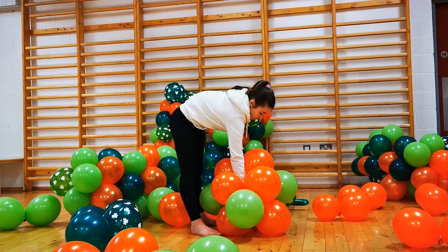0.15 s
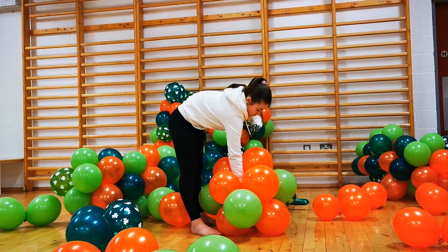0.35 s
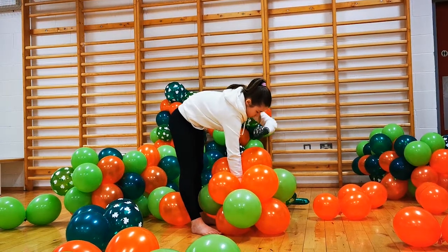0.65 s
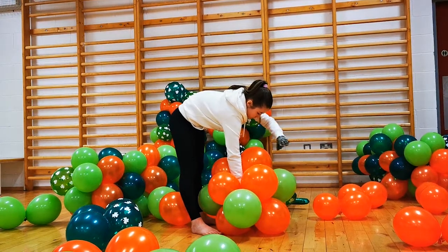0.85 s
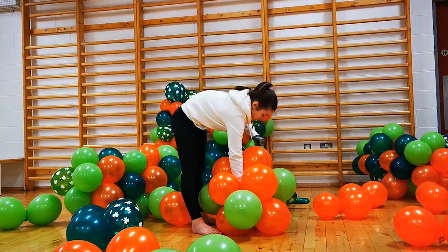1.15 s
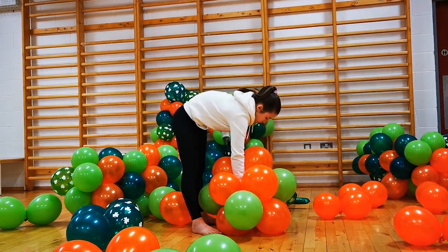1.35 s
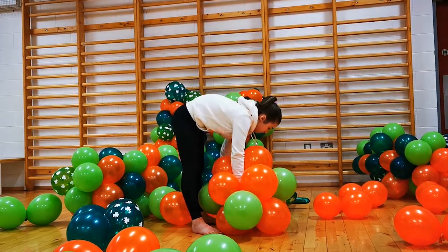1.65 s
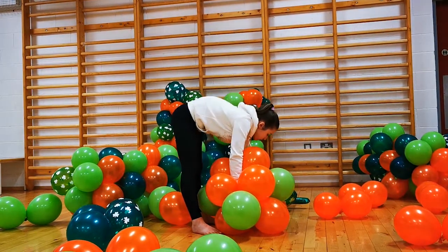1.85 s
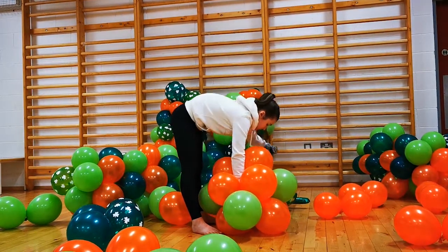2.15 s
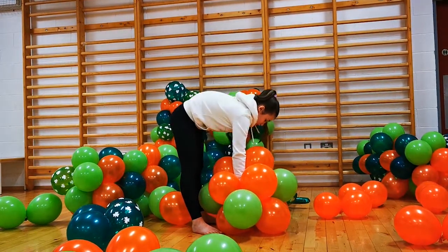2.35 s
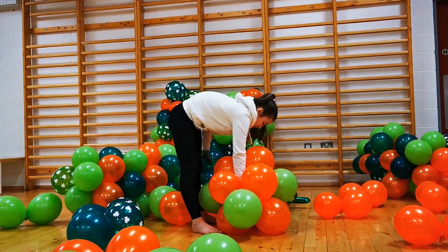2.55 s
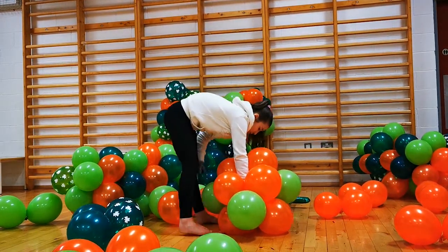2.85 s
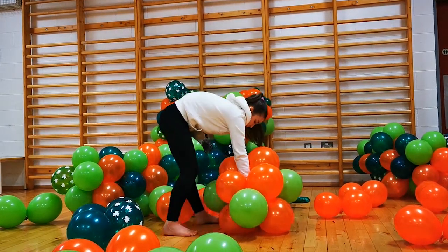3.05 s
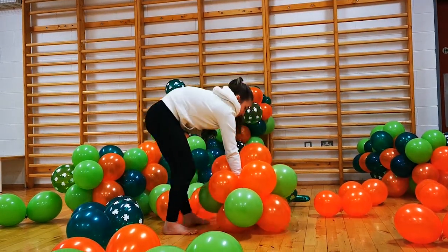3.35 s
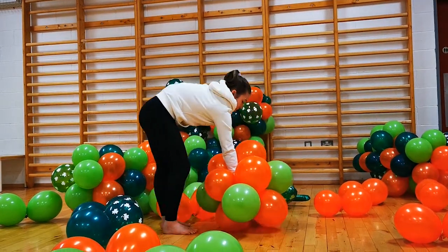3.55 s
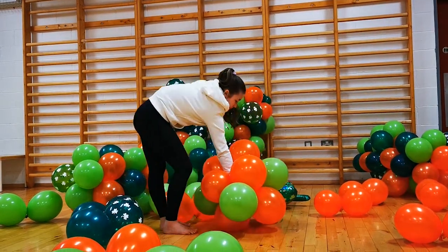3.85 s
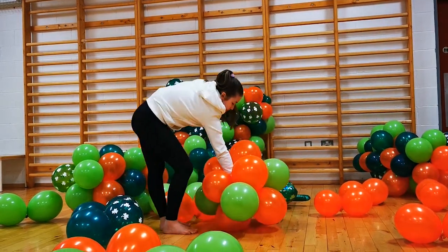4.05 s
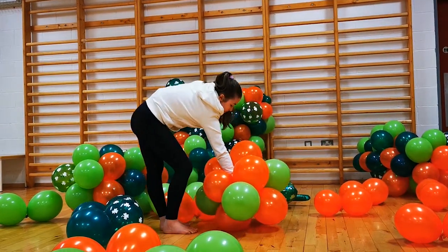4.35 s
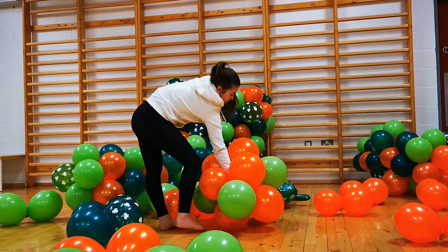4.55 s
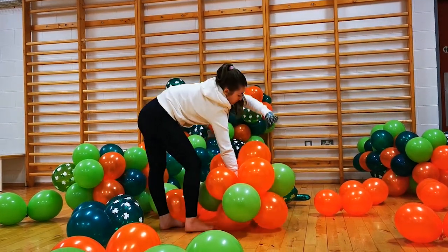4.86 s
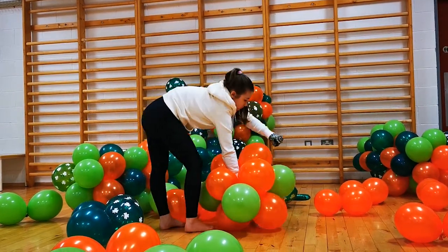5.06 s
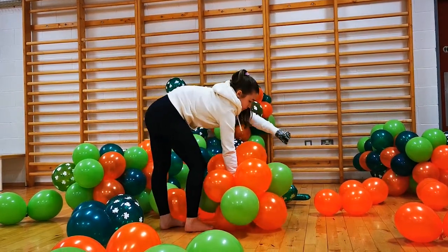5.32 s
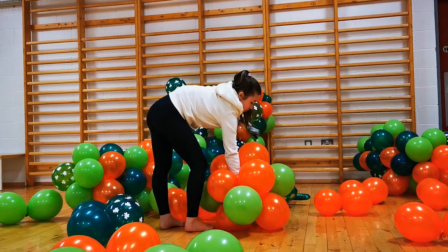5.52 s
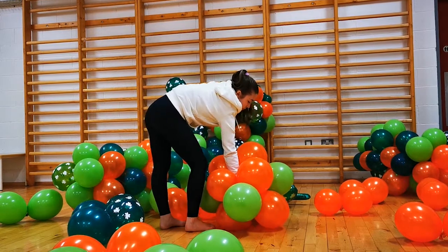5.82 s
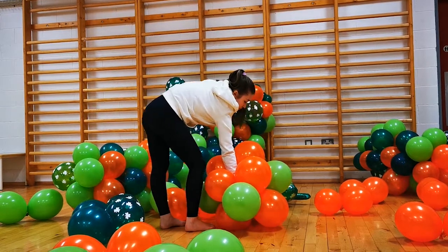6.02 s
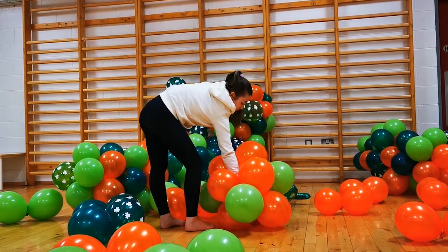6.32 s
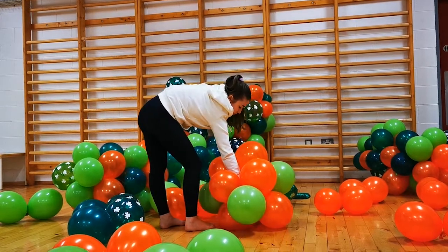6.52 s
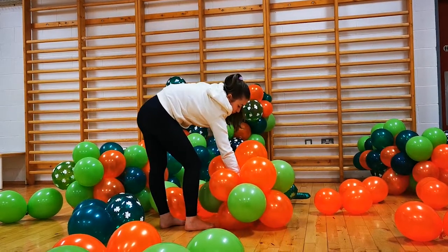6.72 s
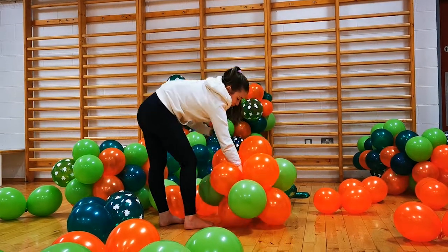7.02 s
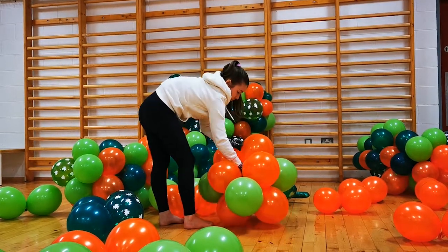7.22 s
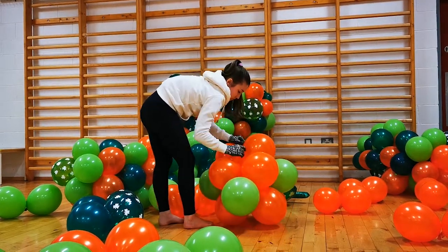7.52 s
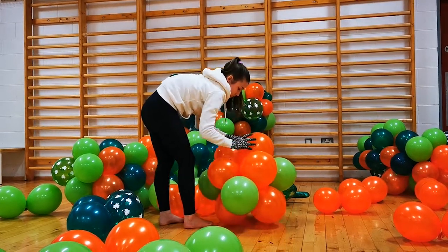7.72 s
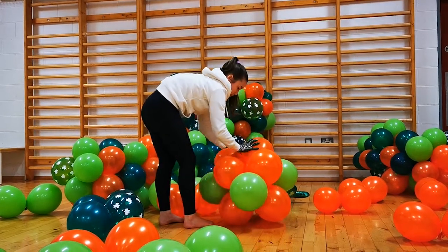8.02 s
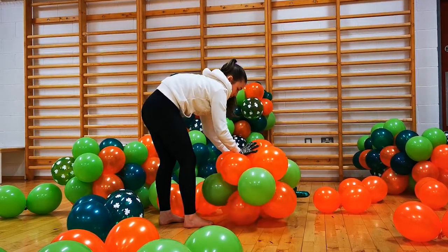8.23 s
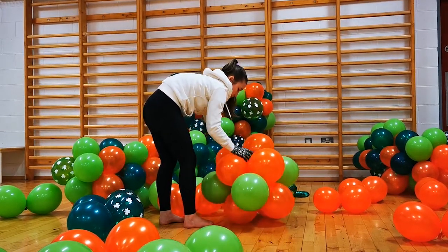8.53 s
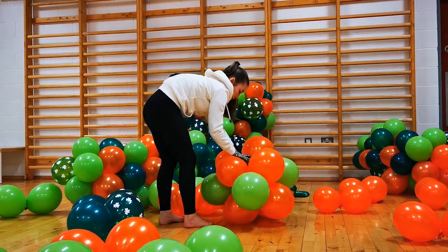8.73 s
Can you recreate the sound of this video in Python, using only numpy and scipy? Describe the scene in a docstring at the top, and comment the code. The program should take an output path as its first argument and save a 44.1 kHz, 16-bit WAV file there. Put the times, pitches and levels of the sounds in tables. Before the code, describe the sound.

A cluster of inflated latex balloons is handled in a reverberant wooden hall. Early on come separate hollow bumps with skin slaps and brief hissy skids, with faint creaks between. Midway, a flurry of snapping creaks, then more knocks. Later the rubbing grows stronger, with a sharp crack, short squeaks and rasping strokes. Stereo microphones at a modest distance catch a ringing tail, quiet air noise and a low wavering hum.

```python
"""Balloons rubbed in a sports hall

A cluster of latex balloons is pressed and turned by hand in a wooden sports hall.
The balloons bump with a hollow thump and a noisy slap, made from ringing tones and short noise bursts.
They skid with a hiss of noise, and creak, snap and squeak where their skins stick and slip.
The hall rings on for about a second, over steady air noise and a low hum that wavers."""
import sys
import numpy as np
from scipy import signal
from scipy.fft import rfft, irfft, next_fast_len
from scipy.io import wavfile
from scipy.ndimage import uniform_filter1d, map_coordinates

SR = 44100
rng = np.random.default_rng(int(sys.argv[2]) if len(sys.argv) > 2 else 0)


def pcm_store(signal):
    """Save signal as 16-bit PCM."""
    levels = np.round(np.clip(np.atleast_2d(signal), -1, 1) * 32767)
    wavfile.write(sys.argv[1], SR, levels.astype(np.int16).T)


N = 391608  # length of the scene [samples]

# low resonances of the air in a balloon: (frequency [Hz], width before damping [Hz], relative level [dB])
BOOM_MODES = [(191, 23, -5), (246.6, 37.4, -1.5), (303.5, 42.6, -0.5), (360, 48, -0.5), (444, 57, -9.5)]
# higher, hollow resonances: (frequency [Hz], width before damping [Hz], relative level [dB])
HOLLOW_MODES = [(487.3, 37, -1), (560, 63, -1), (625.5, 72, -4), (910, 243, -16)]
# tone colour of skin scraping: (frequency [Hz], relative level [dB])
RASP_SPECTRUM = [(300, -24.5), (700, -9), (1000, 6), (1500, -6), (2300, 2), (2900, -5), (4200, -1.5),
                 (5400, -10), (7000, -9), (12000, -35.5)]
# tone colour of the fine hiss of skin on skin: (frequency [Hz], relative level [dB])
HISS_SPECTRUM = [(500, -35), (1500, -7), (3000, -2.5), (4500, 1), (5700, -1.5), (7200, 1), (8600, -0.5),
                 (9700, -1), (10600, 1.5), (12000, -5.5), (14000, -10), (16000, -13.5)]
# tone colour of a whole balloon being pushed: (frequency [Hz], relative level [dB])
THUMP_SPECTRUM = [(15, -27), (35, -9.5), (60, -4), (78, -6), (98, 4), (128, -7.5), (165, -0.5),
                  (260, -22.5), (600, -57), (2000, -71)]


def bumps():
    """Skins brush just before they meet; the bump pushes the whole balloon, rings its air and slaps its skin."""
    # (time [s], thump [dB], boom [dB], hollow ring [dB], ring pitch [ratio], slap [dB],
    # slap treble [dB], left over right [dB]); sound levels are before the trims below
    bump_table = [(.165, -65, -51, -67, 0.83, -60, -66, -3), (.237, -69, -54.5, -71, 1.1, -65, -74, 3),
                  (.69, -44, -39, -42.5, 0.99, -50.5, -43.5, 0), (.912, -33.5, -35, -37, 0.94, -39, -35, 2),
                  (1.327, -55, -45, -47, 1.07, -52.5, -69, 2.5),
                  (2.407, -54, -44.5, -48.5, 0.778, -60, -63, 3), (2.465, -61, -60, -67, 0.8, -70, -66, 3),
                  (3.163, -33, -30, -33, 1.06, -44, -46.5, 1),
                  (3.539, -46, -46.5, -35.5, 1.002, -43, -36.5, -2.5),
                  (5.228, -36.5, -41, -42, 1, -38, -35.5, -1.5),
                  (5.418, -40, -35.5, -35, 0.93, -39, -33, -2),
                  (5.718, -45.5, -43.5, -45, 1.03, -45.5, -53, -1),
                  (8.234, -46, -57, -56, 0.76, -64, -70, -1)]
    # tone colour of slapped skin: (frequency [Hz], relative level [dB])
    slap_spectrum = [(200, 1), (700, -5), (1200, 1.5), (2300, 5), (3000, 0.5), (4200, -3), (6000, -6.5),
                     (14000, -48)]
    out = np.zeros((2, N))
    t = np.arange(SR // 6) / SR
    lead = np.arange(SR // 80) / SR  # the brush comes before the blow
    for s, thump_db, boom_db, ring_db, pitch, slap_db, treble_db, pan_db in bump_table:
        brush_noise = unit(colour(rng.standard_normal(len(lead)), slap_spectrum))
        brush = amp(slap_db - 10.0) * brush_noise * lead / lead[-1]
        thump = amp(thump_db) * burst(colour(np.exp(-t / 0.00061), THUMP_SPECTRUM))
        boom = amp(boom_db + 0.2) * ring(t, BOOM_MODES, damping=0.82)
        hollow = amp(ring_db - 1.0) * ring(t * pitch, HOLLOW_MODES, damping=1.0)
        slap_noise = puff(t, life=0.003, rise=0.0032)
        slap = amp(slap_db - 5.0) * burst(colour(slap_noise, slap_spectrum))
        treble_noise = puff(t, life=0.0028, rise=0.0013)
        treble = amp(treble_db - 5.5) * burst(colour(treble_noise, HISS_SPECTRUM))
        blow = thump + boom + hollow + slap + treble
        add(out, s - lead[-1], np.r_[brush, blow], pan_db, wet_db=2.5)
    return out


def ring(t, modes, damping):
    """The air in a struck balloon rings briefly, at new strengths each time; a gripping hand damps it."""
    detune = 0.02  # each blow stretches the skin differently: relative spread of the resonances
    strength_spread_db = 1.95
    chance = rng.standard_normal((len(modes), 2))
    total = np.zeros(len(t))
    for k, ((hz, width, db), (a, b)) in enumerate(zip(modes, chance)):
        level = (-1) ** k * amp(db + strength_spread_db * a) * width  # signs alternate
        decay = np.exp(-np.pi * width * damping * t)
        total += level * decay * np.sin(2 * np.pi * hz * (1 + detune * b) * t)
    return burst(total)


def puff(t, life, rise):
    """A burst of noise swells, then dies; its spectrum is evened out before a final fade."""
    noise = rng.standard_normal(len(t)) * np.exp(-t / life) * (1 - np.exp(-t / rise))
    z = rfft(noise)
    even = irfft(z / (np.abs(z) + 1e-9), len(t))
    return even * np.exp(-t / (4 * life)) * (1 - np.exp(-2 * t / rise))


def rubbing():
    """Hands turn the balloons stroke by stroke: each slip rasps on the skin and rings the air, over a fine hiss."""
    # strokes of the hands: (time [s], hold [s], hollow creak [dB], rasp [dB], hiss [dB]), before trims
    stroke_table = [(0.0, 0.013, -48.5, -54, -55.5), (0.154, 0.046, -66, -63.5, -65.5),
                    (0.473, 0.24, -67.5, -84, -71.5), (0.79, 0.13, -49, -57, -56.5),
                    (1.6, 0.07, -56.5, -63, -69), (1.773, 0.18, -57, -64, -69),
                    (2.008, 0.15, -54, -57, -59.5), (2.207, 0.18, -57, -59, -65.5),
                    (2.506, 0.18, -66, -66.5, -65), (2.876, .035, -49, -51, -65),
                    (3.048, 0.13, -49.5, -56, -60.5), (3.374, 0.14, -55, -67, -65.5),
                    (3.844, 0.22, -60.5, -68, -72), (4.268, 0.046, -55, -67, -72),
                    (4.495, 0.12, -48.5, -54, -60), (4.703, 0.13, -52.5, -56.5, -61),
                    (5.156, 0.14, -52, -61, -61), (5.99, 0.079, -57, -68, -85),
                    (6.403, 0.092, -49, -65, -65.5), (6.498, 0.048, -64, -61.5, -64.5),
                    (6.65, 0.045, -70, -63, -64), (6.98, 0.16, -48, -61.5, -67),
                    (7.166, 0.13, -41, -48.5, -58.5), (7.298, 0.123, -40.5, -45.5, -54),
                    (7.404, 0.093, -48, -61, -63), (7.788, 0.032, -68, -78, -66.5),
                    (7.912, 0.12, -53, -60.5, -70.5), (8.025, 0.15, -48, -54, -62.5),
                    (8.14, 0.15, -47.5, -50.5, -58), (8.287, 0.16, -38, -44, -52.5),
                    (8.477, 0.15, -48, -57, -57.5), (8.688, 0.082, -46.5, -56, -62.5),
                    (8.866, 0.034, -39, -43, -51)]
    # the hands never lie quite still: (hollow creak [dB], rasp [dB], hiss [dB]), before trims
    resting_db = (-66.5, -75.5, -84.5)
    # where the hands rub: (time [s], left over right [dB])
    place = [(0, 0), (3, 3.5), (3.8, -1), (6, -1.5), (7.3, -1.5), (8.8, -1.5)]
    # tone colour of the hollow creak: (frequency [Hz], relative level [dB])
    creak_spectrum = [(40, -43.5), (80, -7), (100, -4), (130, -7.5), (170, -4), (220, -6), (290, -2.5),
                      (400, -3.5), (520, 0.5), (650, -5), (800, -11.5), (1200, -19.5), (2500, -43.5),
                      (6000, -85)]
    grip_s, release_s = 0.031, 0.022  # a stroke swells before its hold and dies after it (time constants)
    catch_db, catches_per_s = 2.5, 70  # the skin catches and lets go unevenly within a stroke

    drive = amp(resting_db)[:, None] * np.ones(N)
    for s, hold, *levels_db in stroke_table:
        stroke = amp(levels_db)[:, None] * swell(s, hold, grip_s, release_s)
        drive = np.maximum(drive, stroke)
    drive = drive * unit(amp(catch_db * wobble(catches_per_s)))
    creak_drive, rasp_drive, hiss_drive = drive

    pushes = slips(rate=240, scatter_db=4)
    creak = amp(-6.0) * creak_drive * unit(colour(pushes, creak_spectrum))
    scrape = unit(colour(unit(pushes) + 0.54 * rng.standard_normal(N), RASP_SPECTRUM))
    rough = scrape + 1.02 * crackle(pushes, hz=1710, spread=0.56)
    rasp = amp(-7.0) * rasp_drive * unit(rough)
    grit = 0.95 * unit(pushes) + rng.standard_normal(N)
    hiss = amp(-5.5) * hiss_drive * unit(colour(grit, HISS_SPECTRUM))

    rub = creak + rasp + hiss
    pan_db = curves(place)[0]
    out = np.zeros((2, N))
    for start in range(0, N, SR // 3):  # the hall tail is drawn anew for every third of a second
        add(out, start / SR, rub[start:start + SR // 3], pan_db[start], wet_db=1.72)
    return out


def slips(rate, scatter_db):
    """Stick and slip: sharp pushes of uneven size at a wandering rate [per second], evened in loudness."""
    speed = rate * np.exp(.5 * wobble(14))
    fired = rng.random(N) < speed / SR
    sizes = amp(scatter_db * np.clip(rng.standard_normal(N), -2, 2))
    pushes = fired * sizes * rng.choice([-1, 1], N)
    local_power = np.abs(uniform_filter1d(pushes ** 2, size=3000))
    return pushes / np.sqrt(local_power + 1e-6)


def crackle(pushes, hz, spread, size=256):
    """Every slip shakes the skin at its own pitch, scattered around hz."""
    at = np.flatnonzero(pushes)[:, None]
    k = np.arange(size)
    pitch = hz * np.exp(spread * np.clip(rng.standard_normal(N), -2, 2))[at]
    grains = pushes[at] * np.sqrt(pitch) * chatter(pitch * k / SR)
    return unit(np.bincount((at + k).ravel(), grains.ravel(), N + size)[:N])


def chatter(cycles):
    """A slip shakes the skin for a few cycles."""
    return cycles * np.exp(-cycles / 0.61) * np.sin(2 * np.pi * cycles)


def snaps():
    """Stretched skin lets go in a chatter of a few cycles and kicks the air inside; high snaps crack more."""
    # (time [s], hollow ring [dB], click before trim [dB], click pitch [Hz], left over right [dB])
    snap_table = [(1.809, -57, -74, 2190, 3), (1.847, -77, -52.5, 4700, 10), (2.003, -51.5, -66, 1650, 3),
                  (3.049, -46, -56, 2800, 2), (3.339, -49, -58, 1690, -10), (4.27, -56.5, -63, 3310, -5),
                  (4.391, -57, -61, 2720, -2), (4.467, -48, -55, 1470, -2), (4.523, -49.5, -68, 1870, -5),
                  (4.569, -46, -49, 1700, -4), (4.581, -56, -54, 1640, 2), (4.699, -38, -40.5, 1370, -2),
                  (4.761, -71, -52.5, 2380, -7), (4.779, -59.5, -52, 3190, 0), (4.803, -48, -55, 1410, -4),
                  (4.828, -55, -56, 2440, -2), (5.228, -72, -31, 4400, 0), (6.373, -55.5, -63, 1340, -1),
                  (6.875, -55.5, -64, 2500, -5), (7.056, -51, -55, 6300, -5),
                  (7.2793, -50, -30, 5700, -1.5), (7.357, -47, -48.5, 2010, -13),
                  (8.061, -44.5, -59, 1700, -4), (8.132, -42.5, -50, 1960, 2), (8.276, -44.5, -45, 3480, 0),
                  (8.323, -37, -45.5, 1980, -4), (8.456, -43, -47, 2750, -4), (8.612, -45, -61, 2120, 1),
                  (8.713, -47, -55, 2360, -4), (8.757, -49, -53, 1860, -1), (8.806, -44.5, -48, 1860, -1)]
    # tone colour of the sharp crack: (frequency [Hz], relative level [dB])
    crack_spectrum = [(300, -4), (1000, -34), (2500, -7.5), (4000, 8.5), (5600, -7.5), (6900, 10),
                      (9000, -11), (11500, 2.5), (16000, -4)]
    out = np.zeros((2, N))
    t = np.arange(SR // 16) / SR
    for s, ring_db, click_db, hz, pan_db in snap_table:
        crack = burst(colour(puff(t, life=.0009, rise=.0004), crack_spectrum))
        scrape = burst(colour(puff(t, life=0.0023, rise=0.0013), RASP_SPECTRUM))
        click = burst(burst(chatter(t * hz)) + 0.54 * scrape + (hz / 4200) ** 2 * crack)
        hollow_ring = ring(t, HOLLOW_MODES, damping=4.5)
        hollow = burst(hollow_ring + 0.35 * ring(t, BOOM_MODES, damping=2.6))
        snap = amp(click_db - 3.5) * click + amp(ring_db) * hollow
        add(out, s, snap, pan_db, wet_db=-3.5)
    return out


def skids(count=3):
    """Dry latex slides fast over latex: a grainy hiss swells and dies away, its hall tail renewed in pieces."""
    # (time [s], length [s], level before trim [dB], left over right [dB])
    skid_table = [(0.685, 0.046, -47, -2), (0.912, 0.037, -50, 3), (1.303, 0.11, -52.5, 3),
                  (1.357, 0.056, -46.5, 0), (3.543, 0.048, -41, -2.5), (5.228, 0.04, -40.5, -5),
                  (5.423, 0.04, -37, -2), (5.73, 0.046, -42.5, -2.5), (7.053, 0.039, -49, -3),
                  (7.282, 0.033, -62, -2)]
    out = np.zeros((2, N))
    for s, length, db, pan_db in skid_table:
        u = np.linspace(0, 1, int(length * SR))
        grit = rng.standard_normal(len(u)) * amp(1.1 * rng.standard_normal(len(u)))
        hiss = amp(db - 5.5) * unit(colour(grit, HISS_SPECTRUM)) * np.sin(np.pi * u)
        for k, piece in enumerate(np.array_split(hiss, count)):
            add(out, s + k * length / count, piece, pan_db, wet_db=4.5)
    return out


def squeaks():
    """For a moment the slips lock into a rough, unsteady pitch."""
    # (time [s], length [s], middle pitch [Hz], level before fades [dB], roughness [0-1])
    squeak_table = [(2.866, 0.022, 2970, -54.5, .06), (2.871, 0.015, 983, -49.5, 0.21),
                    (2.89, 0.019, 925, -51, .06), (3.185, 0.023, 1510, -50, .15),
                    (5.716, 0.033, 1160, -49.5, 0.25), (5.718, .033, 3254, -51.5, 0.1),
                    (7.171, 0.0087, 1020, -41.5, 0.13), (7.179, .029, 1077, -44, 0.2),
                    (7.35, 0.044, 2200, -50, 0.12), (8.003, 0.032, 1484, -55, 0.13)]
    out = np.zeros((2, N))
    for s, length, hz, db, rough in squeak_table:
        u = np.linspace(0, 1, int(length * SR))
        waver = unit(uniform_filter1d(rng.standard_normal(len(u)), size=40))
        phase = 2 * np.pi * np.cumsum(hz * (1 + rough * waver)) / SR
        tone = np.sin(phase) + 0.11 * np.sin(2 * phase) + 0.16 * np.sin(3 * phase)
        add(out, s, amp(db) * unit(tone) * np.sin(np.pi * u), pan_db=-1.0, wet_db=-2.5)
    return out


def sway():
    """Each shove sets the cluster drumming softly on the wooden floor, as low noise, until it settles."""
    # shoves that rock the cluster: (time [s], hold [s], level before trim [dB])
    shove_table = [(0.0, 0.15, -55.5), (.93, .17, -47), (1.824, 0.29, -49), (2.266, 0.47, -55),
                   (3.2, 0.1, -47), (5.4, 0.18, -58), (7.263, 0.27, -47), (8.287, 0.15, -48)]
    build_s, settle_s = 0.047, 0.052  # time constants of the rocking
    rest_db = -65.5  # the cluster always trembles a little (before trim)
    shoves = [amp(db) * swell(s, hold, build_s, settle_s) for s, hold, db in shove_table]
    rocking = np.hypot(np.max(shoves, axis=0), amp(rest_db))
    noise = filtered(rng.standard_normal((2, N)), lambda hz: amp(along(THUMP_SPECTRUM, hz)))
    return amp(-3.5) * rocking * unit(diffuse(noise))


def air():
    """Steady air noise of the hall with a wavering hum."""
    # tone colour of the air noise: (frequency [Hz], relative level [dB])
    air_spectrum = [(13, -33), (22, 2.5), (95, 1.5), (211, -6.5), (554, -3), (792, -10), (1410, -16),
                    (2200, -17), (2820, -22.5), (4380, -21.5), (5930, -27), (7000, -24.5), (7810, -31),
                    (10900, -25), (16000, -38)]
    # low humming tones: (frequency [Hz], level [dB])
    hum_tones = [(98, -71.5), (163, -84.5)]
    noise = filtered(rng.standard_normal((2, N)), lambda hz: amp(along(air_spectrum, hz)))
    noise = unit(diffuse(noise))
    t = np.arange(N) / SR
    hum = np.zeros(N)
    for hz, db in hum_tones:
        tone = np.sin(2 * np.pi * hz * t + 1.16 * wobble(6.4))
        hum += amp(db) * unit(tone * amp(1.7 * wobble(7)))
    return amp(-61.0) * noise + hum


def hall(x, wet_db, gap=0.0005, build=0.0032):
    """Direct sound plus a diffuse tail of fading noise, drawn anew on each call; the treble dies first."""
    # time the hall takes to fade by 60 dB: (frequency [Hz], time [s])
    fade_times = [(80, 1.05), (210, 0.93), (560, 1.08), (1470, 0.96), (3880, 0.86), (10200, 0.54),
                  (16000, 0.33)]
    # hall against direct sound, before wet_db is added: (frequency [Hz], level [dB])
    wet_levels = [(100, 3.5), (500, 2.5), (1500, 7), (5000, 1), (12000, 1.5)]
    hz, t, z = signal.stft(rng.standard_normal((2, SR * 3 // 4)), SR, nperseg=256)
    t60 = along(fade_times, hz)[:, None]
    energy = np.sqrt(2 * np.log(1000) / (t60 * SR))  # evens the energy of long and short tails
    level = energy * amp(along(wet_levels, hz) + wet_db)[:, None]
    fade = np.exp(-np.log(1000) * t / t60)
    tail = signal.istft(z * level * fade, SR, nperseg=256)[1]
    late = np.maximum(np.arange(tail.shape[1]) / SR - gap, 0)
    answer = diffuse(tail) * (1 - np.exp(-late / build))
    answer[:, 0] += 1  # the direct sound
    return signal.fftconvolve(x[None], answer, axes=1)


def diffuse(pair):
    """Two unrelated noises become a room field: alike in the bass, unrelated in the treble."""
    # how alike left and right are: (frequency [Hz], likeness [0-1])
    likeness = [(60, 1), (150, 0.99), (300, 0.85), (550, 0.71), (1000, 0.18), (2000, 0), (12000, 0)]
    turn = lambda hz: np.arccos(np.clip(along(likeness, hz), -1, 1)) / 2
    mid, side = filtered(pair, lambda hz: np.array([np.cos(turn(hz)), np.sin(turn(hz))]))
    return np.array([mid + side, mid - side])


def add(out, s, x, pan_db, wet_db):
    """Place sound x in the hall at time s."""
    start = max(round(s * SR), 0)
    heard = (sides(pan_db) * hall(x, wet_db))[:, :N - start]
    out[:, start:start + heard.shape[1]] += heard


def sides(pan_db):
    """Left and right gains for a level difference."""
    return amp(np.array([[.5], [-.5]]) * pan_db)


def swell(s, hold, attack, release):
    """Envelope that rises to 1 at time s, holds, then dies away."""
    t = np.arange(N) / SR - s
    return np.exp(np.minimum(t, 0) / attack - np.maximum(t - hold, 0) / release)


def wobble(rate):
    """A smooth random curve through a number of random points a second (rate)."""
    return map_coordinates(rng.standard_normal(int(N * rate / SR) + 4), [np.arange(N) * rate / SR])


def colour(x, spectrum, size=4096):
    """Causal filter with the given spectrum: it rings only after each push."""
    cepstrum = irfft(np.log(amp(along(spectrum, np.fft.rfftfreq(size, 1 / SR)))))
    fold = np.r_[1, np.full(size // 2 - 1, 2), np.zeros(size // 2)]  # moves the ringing after the push
    response = irfft(np.exp(rfft(cepstrum * fold)))
    return signal.fftconvolve(x, response)[:len(x)]


def filtered(x, response):
    """Multiply the spectrum of x by a response of frequency."""
    n = x.shape[-1]
    m = next_fast_len(n + 8192, True)  # spare room at the end
    return irfft(rfft(x, m) * response(np.fft.rfftfreq(m, 1 / SR)), m)[..., :n]


def along(points, hz):
    """Read (frequency, value) points at any frequency, on a log axis."""
    f, v = np.transpose(points)
    return np.interp(np.log(hz + 1), np.log(f + 1), v)


def curves(rows):
    """One value per sample for each column after the time."""
    s, *cols = np.transpose(rows)
    return np.array([np.interp(np.arange(N) / SR, s, c) for c in cols])


def amp(db):
    """Decibels to gain."""
    return 10 ** (np.asarray(db) / 20)


def unit(x):
    """Scale to rms 1."""
    return x / np.sqrt(np.mean(x ** 2) + 1e-20)


def burst(x):
    """Scale a short sound to the energy of 10 ms at rms 1."""
    return x * np.sqrt(SR / 100 / (np.sum(x ** 2) + 1e-20))


def scene():
    """All the balloon sounds in the hall, over its air noise."""
    return bumps() + snaps() + skids() + squeaks() + rubbing() + sway() + air()


def record(dry):
    """The two microphones differ in colour, each port with its own resonances; the top treble is cut off."""
    # tilt of the microphone pair: (frequency [Hz], left over right [dB])
    lean = [(50, 3.5), (130, 2.5), (300, 0), (700, -4), (3000, -1.5), (12000, -7.5)]
    # resonances and dips of the two ports: (frequency [Hz], width [Hz], left [dB], right [dB])
    ports = [(2150, 270, -4.5, 2.5), (4100, 630, 1.5, -1), (5400, 500, -0.5, 0.5), (6950, 340, 2, 3),
             (8750, 700, 8, -2), (10920, 310, -5, 4), (12700, 1100, -3, 1.5), (15600, 610, -1, 4.5)]
    top_hz = 15900  # nothing passes from here up

    def response(hz):
        ports_db = np.zeros((2, len(hz)))
        for centre, width, *db in ports:
            ports_db += np.outer(db, np.exp(-((hz - centre) / width) ** 2))
        return sides(along(lean, hz)) * amp(ports_db) * (hz < top_hz)

    return filtered(dry, response)


dry = scene()
out = record(dry)
pcm_store(out)
```